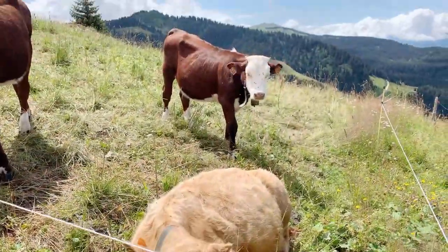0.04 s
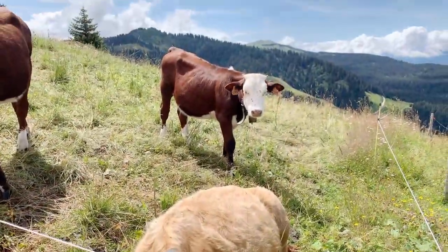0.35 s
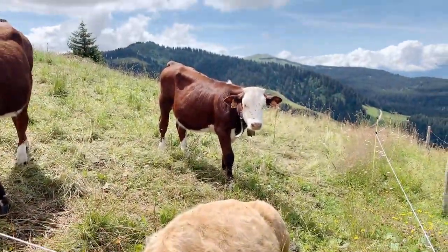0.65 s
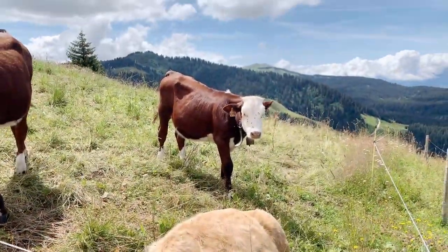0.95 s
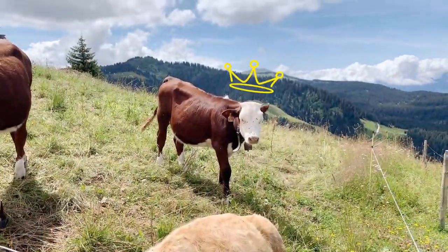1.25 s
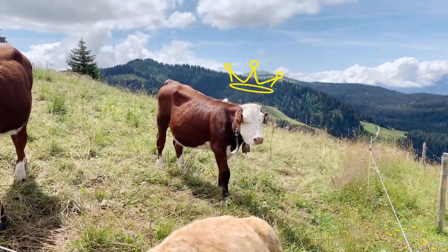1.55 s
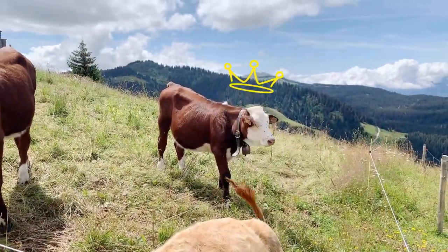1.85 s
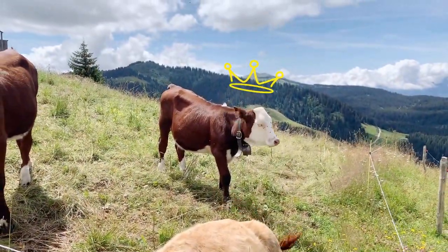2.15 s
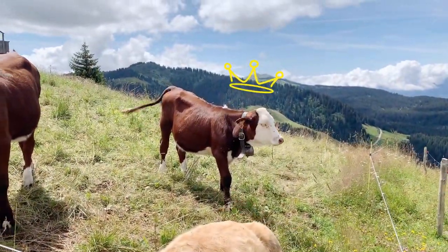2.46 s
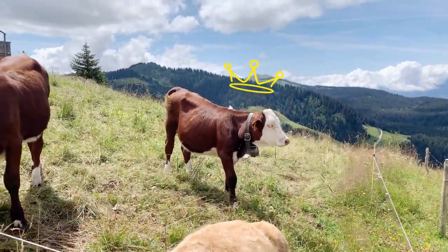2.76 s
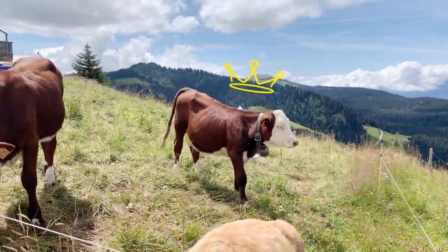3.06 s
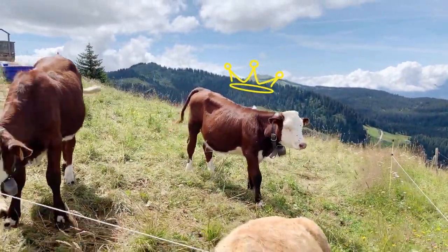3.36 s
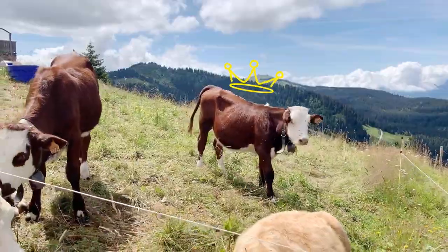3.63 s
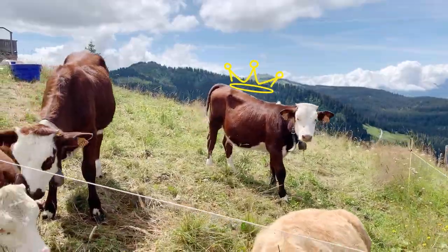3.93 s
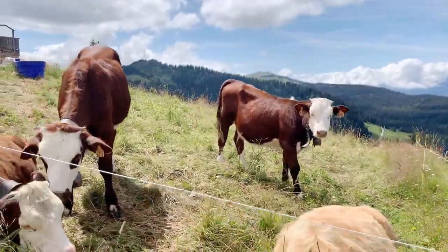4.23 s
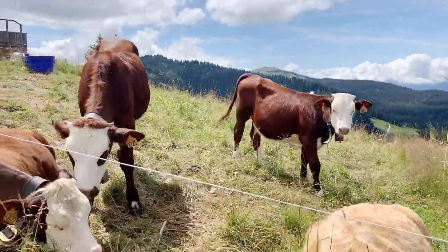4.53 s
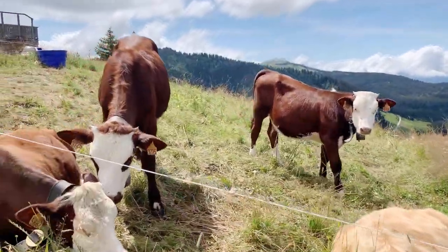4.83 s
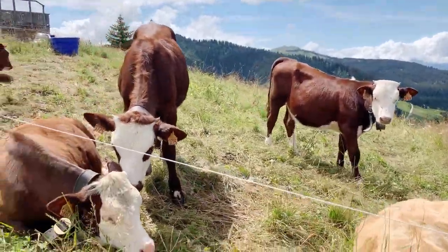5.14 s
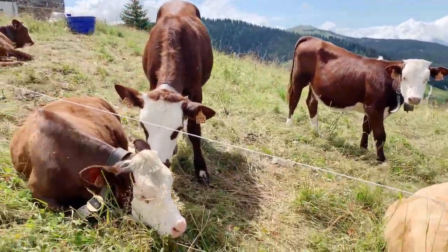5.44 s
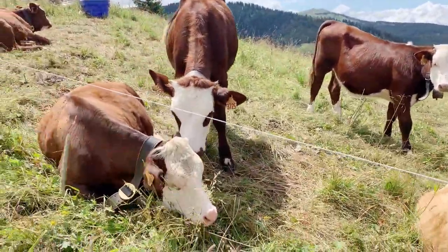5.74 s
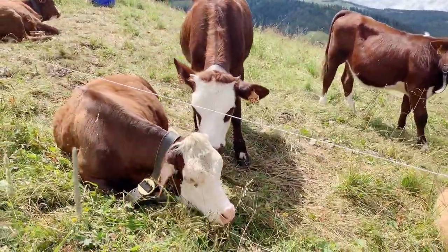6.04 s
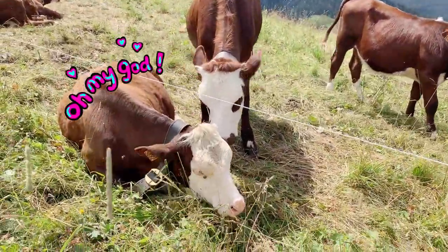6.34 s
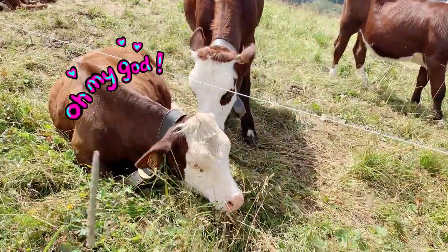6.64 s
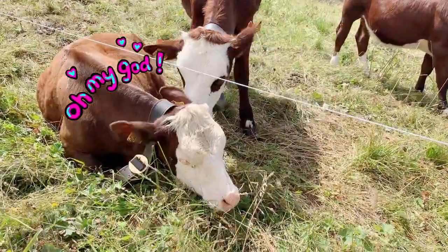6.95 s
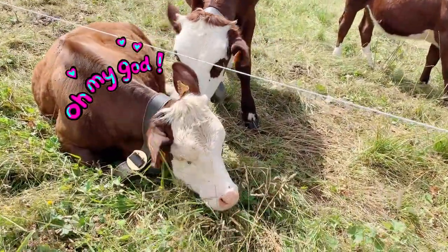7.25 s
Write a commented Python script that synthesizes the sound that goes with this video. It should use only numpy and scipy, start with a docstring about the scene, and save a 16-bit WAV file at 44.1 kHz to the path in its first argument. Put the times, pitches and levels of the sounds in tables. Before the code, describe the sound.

Wind buffets the microphone in a pasture as tinny cowbells clank unevenly, with faint sounds of tearing grass.

```python
"""Two sheet-metal cowbells of nearly the same pitch clank on calves in a mountain pasture.
A bell's oval shape splits its lowest modes into pairs that beat; the point where the clapper
strikes decides how the energy divides within each pair. Grass is torn and trodden in runs of
small snaps, among dry ticks, one dull knock and faint insects. Turbulent gusts of wind rumble
and thump on the microphone. A soft hiss comes and goes."""
import sys
import numpy as np
from scipy import signal
from scipy.fft import rfft, irfft
from scipy.io import wavfile
from scipy.ndimage import uniform_filter1d

SR = 44100
rng = np.random.default_rng(int(sys.argv[2]) if len(sys.argv) > 2 else 0)


def persist_wave(psi):
    """Save psi, clipped to +-1, as 16-bit WAV."""
    counts = np.round(np.clip(psi, -1, 1) * 32767).astype(np.int16)
    wavfile.write(sys.argv[1], SR, np.atleast_2d(counts).T)


N = 330309
TIME = np.arange(N) / SR

# single eddies striking the microphone: t/s, peak level/dB, half length of the surrounding gust/s
EDDIES = [(.413, -14.5, 0.011), (2.064, -16, 0.015), (2.22, -11, 0.027), (2.6, -15, 0.022),
          (3.23, -19, 0.021), (4.094, -14.5, 0.027), (4.40, -8, 0.029), (4.965, -13, 0.011),
          (5.306, -10, 0.021), (6.48, -10, 0.0093), (6.58, -11, .02), (6.729, -14.5, 0.0087),
          (7.012, -8, .014)]


def gain_of(db):
    """Amplitude ratio of a level in decibels."""
    return 10 ** (np.asarray(db) / 20)


def unit_rms(x):
    """Normalisation to a root mean square of one."""
    return x / np.sqrt(np.mean(x ** 2) + 1e-20)


def add(mix, start, sound):
    """Superposition: a sound joins the mix at a start time in seconds."""
    part = mix[max(round(start * SR), 0):][:len(sound)]
    part += sound[:len(part)]


def noise(spectrum, size, shift=1):
    """Spectral shaping: white noise follows points (f/Hz, level/dB), their frequencies times shift."""
    hz, db = np.transpose(spectrum)
    shape_db = np.interp(np.log(np.fft.rfftfreq(size, 1 / SR) + 1), np.log(hz * shift + 1), db)
    return unit_rms(irfft(rfft(rng.standard_normal(size)) * gain_of(shape_db), size))


def wander(rate_hz):
    """Random modulation: low-pass Gaussian noise of unit rms."""
    hz = np.fft.rfftfreq(N, 1 / SR)
    return unit_rms(irfft(rfft(rng.standard_normal(N)) * np.exp(-(hz / rate_hz) ** 2), N))


def hump(middle, half_length):
    """A Gaussian envelope of unit height."""
    return np.exp(-((TIME - middle) / half_length) ** 2 / 2)


def swelled(rest_db, swells):
    """Power addition: the level in dB of swells (t/s, level/dB, half length/s) over a resting level."""
    power = sum(gain_of(db) ** 2 * hump(at, half_length) for at, db, half_length in swells)
    return 10 * np.log10(gain_of(rest_db) ** 2 + power)


def wind(flutter_db=2.5, flutter_hz=9.9, eddy_gust_db=-7, calm_db=-21):
    """Turbulent pressure: the finer the eddies on the microphone, the faster they grow with a gust."""
    # slow rise and fall of the wind: t/s, level/dB
    breeze = [(0.0, -31.5), (0.33, -34), (0.58, -26.5), (0.95, -24), (1.4, -28.5), (1.85, -23.5),
              (2.2, -19.5), (2.9, -25.5), (3.2, -24.6), (4.25, -27), (4.65, -28.5), (4.9, -21.5),
              (5.5, -20.5), (5.75, -23.5), (6.28, -24.5), (6.5, -16.5), (7.0, -21.5), (7.22, -28.0)]
    # brief lulls: t/s, level change/dB, half length/s
    lulls = [(1.371, -8, 0.023), (1.729, -7.5, 0.023), (2.421, -17, 0.0099), (3.533, -20, 0.037),
             (5.07, -11, 0.029), (5.813, -11.5, 0.032)]
    # spectrum of the slow pushes of air: f/Hz, level/dB
    push = [(8.8, -19), (15, -14.5), (43, 5.5), (83, 2.5), (134, -8), (240, -28), (310, -68), (530, -120)]
    # spectrum of the finer buffeting: f/Hz, level/dB
    buffet = [(70, -13.5), (130, 6.5), (190, -3), (260, -9.5), (350, -21.5), (500, -29), (800, -55),
              (1500, -82)]
    breeze_db = np.interp(TIME, *np.transpose(breeze)) + flutter_db * wander(flutter_hz)
    breeze_db += sum(db * hump(at, half_length) for at, db, half_length in lulls)
    gust_db = swelled(breeze_db, [(at, db + eddy_gust_db, half_length) for at, db, half_length in EDDIES])
    lumps = gain_of(4.5 * wander(rate_hz=35))  # eddies of all sizes arrive together
    # coarse to fine: noise, level re calm/dB, growth in dB per dB of gust
    layers = [(noise(push, N), -0.5, 1),
              (noise(buffet, N), -12, 1.8),
              (noise(buffet, N, shift=1.58), -38, 3.86)]
    out = np.zeros(N)
    for flow, db, growth in layers:
        flow = flow * lumps ** (growth - 0.5)
        running_rms = np.sqrt(uniform_filter1d(uniform_filter1d(flow ** 2, size=3000), size=1800))
        out += flow / running_rms * gain_of(calm_db + db + growth * (gust_db - calm_db))
    return out


def soft_hiss(rest_db=-69.5, waver_db=1.8):
    """Amplitude modulation: a soft broadband hiss comes and goes."""
    # spectrum of the hiss: f/Hz, level/dB
    spectrum = [(400, 9), (1000, 3.5), (2000, 6), (3000, 0), (5000, -1), (8000, -2), (10000, -0.5),
                (11200, -9.5), (15800, 0.5)]
    # swells of the hiss: t/s, level/dB, half length/s
    swells = [(2.302, -55.5, 1), (3.492, -49, .08), (4.06, -46.5, 0.13), (5.15, -48.5, 0.23),
              (5.865, -54, 0.15), (6.177, -51, 0.27), (6.96, -50, 0.13)]
    level_db = swelled(rest_db, swells) + waver_db * wander(rate_hz=26)
    return gain_of(level_db) * noise(spectrum, N)


def pasture(air_db=-56, murmur_db=-64):
    """Ambient noise: distant air, insects and a far, drifting murmur add incoherently."""
    # spectrum of the open air, with insects at the top: f/Hz, level/dB
    air = [(200, -7.5), (500, 10.5), (1000, 7), (1400, -11), (1800, -17), (2500, -7.5), (4000, -6),
           (6000, -67), (10000, -31), (12000, -10), (14000, -6), (15800, 1)]
    murmur_spectrum = [(900, 2.5), (1500, 1.0), (1900, 7.5), (2800, -34.5)]  # f/Hz, level/dB
    murmur = gain_of(murmur_db + 2 * wander(rate_hz=9)) * noise(murmur_spectrum, N)
    return gain_of(air_db) * noise(air, N) + murmur


def grass(snaps_per_s=260, snap_decay_s=0.0034):
    """Shot noise: a tuft tears as a quick random run of snapping blades."""
    # tufts torn or trodden: t/s, level/dB, half length/s, centre f/Hz
    tufts = [(0.076, -47, 0.015, 3230), (0.88, -51.5, 0.011, 1630), (1.016, -43, 0.0083, 2100),
             (1.204, -47, 0.0084, 3460), (2.039, -45, 0.036, 2056), (2.174, -49, 0.022, 3320),
             (3.219, -40.5, 0.011, 2800), (3.398, -47.5, 0.011, 4640), (6.338, -44, 0.0069, 2500),
             (6.461, -38.5, .009, 3440), (7.407, -41.5, 0.018, 2400), (7.483, -43, 0.01, 2470)]
    # spectrum of a tear centred on 3000 Hz: f/Hz, level/dB
    tear_spectrum = [(1300, -3.5), (2200, 6), (3000, 9.5), (4200, 2), (6200, -24), (10000, -55)]
    faint_tufts = [(at, -59.5, 0.0041, 2900) for at in rng.uniform(0, N / SR, size=6)]
    out, t = np.zeros(N), np.arange(-2205, 2205) / SR
    for at, db, half_length, hz in tufts + faint_tufts:
        snaps = rng.uniform(0.23, 1, len(t)) * (rng.random(len(t)) < snaps_per_s / SR)
        crackle = 0.1 + signal.lfilter([1], [1, -np.exp(-1 / (snap_decay_s * SR))], snaps)
        pull = np.exp(-(t / half_length) ** 2 / 2)
        tear = unit_rms(pull * crackle * noise(tear_spectrum, len(t), shift=hz / 3000))
        add(out, at + t[0], gain_of(db) * np.sqrt(np.mean(pull ** 2)) * tear)
    return out


def thumps(typical_width_s=0.0017, typical_gust_s=0.018):
    """A passing eddy is a pressure pulse of either sign between two weaker, opposite lobes."""
    out, t = np.zeros(N), np.arange(-600, 600) / SR
    for at, db, half_length in EDDIES:
        width = typical_width_s * np.sqrt(half_length / typical_gust_s)  # shorter gust, sharper thump
        pulse = (1 - (t / width) ** 2) * np.exp(-(t / width) ** 2 / 2)
        add(out, at + t[0], gain_of(db) * rng.choice([-1, 1]) * pulse)
    return out


def ring(hz, amplitudes, t60, t):
    """Free vibration: a sum of exponentially damped modes with random phases."""
    phase = rng.random((len(hz), 1))
    decay = np.exp(-np.log(1000) * t / t60[:, None])
    return amplitudes @ (np.sin(2 * np.pi * (hz[:, None] * t + phase)) * decay)


def bell(twins, overtones, blows, rise_s, overtone_db, leak=0.0083, scatter_db=5.5, tinny_db=-3.5):
    """Mode splitting: an oval shell rings in beating twins; each blow stops the old ring, starts anew."""
    # order of each twin pair: number of bending waves round the rim
    rim_waves = [2, 3, 4, 5]
    # node of each upper twin on the rim: angle/degrees
    node_deg = [0, 35.5, 11.5, 26.5]
    low_hz, low_t60, high_hz, high_t60 = np.transpose(twins)
    over_hz, over_db, over_t60 = np.transpose(overtones)
    octaves = np.log2(over_hz / np.median(over_hz))
    ends = [blow[0] for blow in blows[1:]] + [N / SR]
    out = np.zeros(N)
    for (start, db, angle, *pair_db), end in zip(blows, ends):
        t = np.arange(0, end - start + 2 * rise_s, 1 / SR)
        # the striking point divides the power between twins; a little leaks in even at a node
        coupling = np.sin(np.multiply(rim_waves, np.radians(angle - np.array(node_deg)))) ** 2
        upper_share = leak + (1 - 2 * leak) * coupling
        tone = ring(low_hz, gain_of(pair_db) * np.sqrt(1 - upper_share), low_t60, t)
        tone += ring(high_hz, gain_of(pair_db) * np.sqrt(upper_share), high_t60, t)
        # each blow deals the same energy out differently among the overtones
        amplitudes = gain_of(over_db + scatter_db * rng.standard_normal(len(over_hz)))
        amplitudes *= np.linalg.norm(gain_of(over_db + overtone_db)) / np.linalg.norm(amplitudes)
        tilt_db_per_octave = 0.5 + 0.0926 * (db + 29)  # a harder blow is brighter
        brightness = gain_of(tilt_db_per_octave * octaves)
        tone += ring(over_hz, amplitudes * brightness, over_t60, t)
        # short-lived neighbours of the overtones make the clank rough and tinny
        nearby_hz = over_hz * (1 + 0.0183 * rng.standard_normal(len(over_hz)))
        tone += ring(nearby_hz, brightness * gain_of(over_db + overtone_db + tinny_db), over_t60 / 2, t)
        attack = 1 - np.exp(-t / rise_s)
        release = np.clip((t[-1] - t) / (2 * rise_s), 0, 1)
        add(out, start, gain_of(db) * tone * attack * release)
    return out


def clapper(blows, click_db=4.5, click_decay_s=0.0022, rattle_db=-11, rattle_decay_s=0.019):
    """Impact of metal on metal: a sharp click and a short wash of dense modes."""
    # spectrum of the contact: f/Hz, level/dB
    contact = [(300, -9), (700, -42), (950, 16), (1400, -13), (2200, 7.5), (2800, 0.5), (4000, 1),
               (5000, 2.5), (10000, -8.5), (15500, -2)]
    out, t = np.zeros(N), np.arange(4096) / SR
    click = gain_of(click_db) * np.exp(-t / click_decay_s)
    rattle = gain_of(rattle_db) * np.exp(-t / rattle_decay_s)
    for start, db, *_ in blows:
        add(out, start, gain_of(db) * (click + rattle) * noise(contact, len(t)))
    return out


def cowbells():
    """Impulse excitation: clappers ring the natural modes of two bells of nearly the same pitch."""
    # four lowest mode pairs: lower f/Hz, its T60/s, upper f/Hz, its T60/s
    first_twins = [(786, .28, 807, .33), (2007, 1.55, 2089, 1.3), (3704, .56, 3776, .38),
                   (5769, .39, 5928, .37)]
    second_twins = [(783, .25, 806, .27), (2018, 1., 2060, 1.), (3684, 1.4, 3758, 2.0),
                    (5735, .33, 5846, .33)]
    # other modes: f/Hz, relative level/dB, T60/s
    first_overtones = [(2181, -2, .085), (2950, -26, .1), (3838, -1, .19), (3905, -8, .09),
                       (6430, -15, .09), (6605, -11, .11), (6977, -19, .18), (8065, -7, .21),
                       (8186, -14, .09), (8433, -7, .19), (8656, -7, .18), (9308, -14, .11),
                       (9534, -16, .13), (9586, -15, .2), (10050, -12, .12), (10325, -5.5, .12),
                       (10470, -14, .11), (10635, -12, .13), (11430, -19, .07), (11890, -21, .1),
                       (12280, -20, .09), (12630, -18, .09), (13650, -19, .07), (14070, -21, .11),
                       (14420, -19, .11), (14730, -16, .09), (14920, -14, .1), (15400, -16, .1)]
    second_overtones = [(2220, -19, 0.049), (3920, -5.5, .12), (6450, -5, 0.067), (8000, -10, 0.13),
                        (8360, -8.5, 0.29), (8900, -1, 0.057), (9240, -9, 0.093), (10100, -6.5, 0.067),
                        (10450, -6.5, 0.16), (10800, -13, .12), (12320, -12, 0.13), (13370, -11, .1),
                        (14600, -12, 0.13), (15410, -14, 0.13)]
    # clapper blows: t/s, level/dB, angle on the rim/degrees, then each pair's level re the blow/dB
    first_blows = [(0.431, -36, 36.8, 12.5, 3, 9, -4.5), (0.602, -36.5, 163.9, 11.5, 3, 7, -7),
                   (1.723, -56.5, 86.3, 17, 13.5, 14, 0), (1.922, -42, 150.4, 15.5, 2, 7.5, -15),
                   (2.099, -35, 117, 9, -2, 7, -1.5), (2.21, -30.5, 66, 12, -3.5, 11, 5.5),
                   (2.629, -51, 172.6, 14, 8.5, 20, 11.5), (2.985, -41, 113.4, 11.5, -8, 8.5, 4),
                   (3.876, -36, 30.3, 4.5, 6.5, 10.5, 9), (4.285, -31.5, 134, -0.5, 4, 9.5, -3),
                   (4.385, -39, 131.3, 0.5, 7.5, 10, 6.5), (4.859, -31, 29.2, 8.5, -4, 8.5, 12),
                   (5.3337, -32.5, 30.4, 1.5, -10.5, 0, 7.5), (5.822, -44.5, 94.6, 6, 7, 6.5, 13),
                   (6.197, -38.5, 40.6, 11, 4.5, 1, -11.5), (6.702, -25.5, 148, 2.5, -5.5, -4.5, -2),
                   (6.801, -24, 41, 10, 3.5, -0.5, -2), (7.0846, -32.5, 153, 7, 6, -2, 10.5)]
    second_blows = [(2.869, -40.5, 75, 1.5, 3, 9, -8), (3.603, -45.5, 40.4, 11.8, -4.5, 2, -3),
                    (3.786, -33, 119.6, 4, -8.5, 3, -1.5), (3.988, -34, 130, 8, -33, -2.5, 1.5)]
    first_bell = bell(first_twins, first_overtones, first_blows, rise_s=0.0026, overtone_db=5.5)
    second_bell = bell(second_twins, second_overtones, second_blows, rise_s=0.0016, overtone_db=4.5)
    return first_bell + second_bell + clapper(first_blows) + clapper(second_blows)


def ticks(decay_s=0.0034, skirt_db=-19):
    """Transients: bursts of band noise decay so fast that they are heard as dry ticks."""
    # ticks: t/s, relative level/dB, centre f/Hz
    bursts = [(.514, -43, 14500), (.535, -47, 14500), (.544, -44, 14500), (1.279, -43, 9300),
              (1.549, -43.5, 5150), (1.749, -42, 14000), (1.772, -48, 14100), (1.783, -40, 14000),
              (5.087, -43.5, 8100), (5.108, -46, 8100), (6.025, -46, 6030)]
    out, t = np.zeros(N), np.arange(6000) / SR
    for start, db, hz in bursts:
        band = [(hz / 2, skirt_db), (hz, 0), (hz * 2, skirt_db)]
        add(out, start, gain_of(db + 2.5) * np.exp(-t / decay_s) * noise(band, len(t)))
    return out


def knock(start_s=1.341, level_db=-38):
    """Heavy damping: the modes of struck metal die quickly, leaving one dull knock."""
    # modes of the damped metal: f/Hz, relative level/dB, T60/s
    modes = [(727, -3, 0.088), (1890, 4.5, 0.062), (1874, -15.5, 0.31), (3390, 1, 0.058), (5280, 7, 0.031),
             (7900, -8, 0.038), (10400, -1, 0.032), (12050, 1, 0.082), (14600, 1, .02)]
    hz, db, t60 = np.transpose(modes)
    out, t = np.zeros(N), np.arange(6000) / SR
    add(out, start_s, ring(hz, gain_of(level_db + db), t60, t))
    return out


def ground_echo(x, wet_db=-18.5, t60=0.07, delay_s=0.004):
    """Scattering: ground and animals add a brief, weak echo to the direct sound."""
    t = np.arange(SR // 2) / SR
    response = rng.standard_normal(len(t)) * np.exp(-np.log(1000) * t / t60) * (t > delay_s)
    return x + gain_of(wet_db) * signal.oaconvolve(x, response / np.linalg.norm(response))[:N]


def scene():
    """Superposition in one channel: bells and grazing, with their echo, over wind, hiss and open air."""
    calves = cowbells() + grass() + ticks() + knock()
    return (ground_echo(calves) + wind() + thumps() + soft_hiss() + pasture())[None]


def record(dry, cutoff_hz=15900):
    """Band limiting: a steep low-pass filter removes the highest treble."""
    lowpass = signal.firwin(401, cutoff_hz, window=("kaiser", 9), fs=SR)
    return signal.oaconvolve(dry, lowpass[None], "same")


dry = scene()
out = record(dry)
persist_wave(out)
```